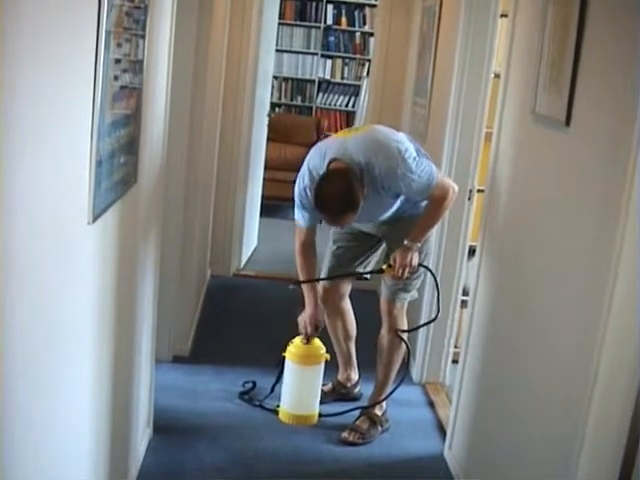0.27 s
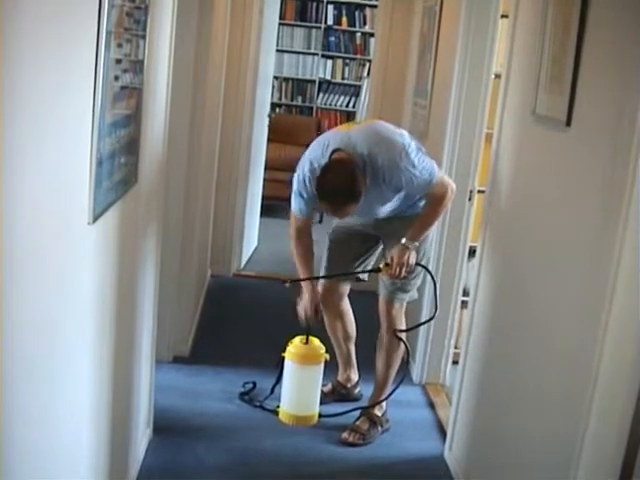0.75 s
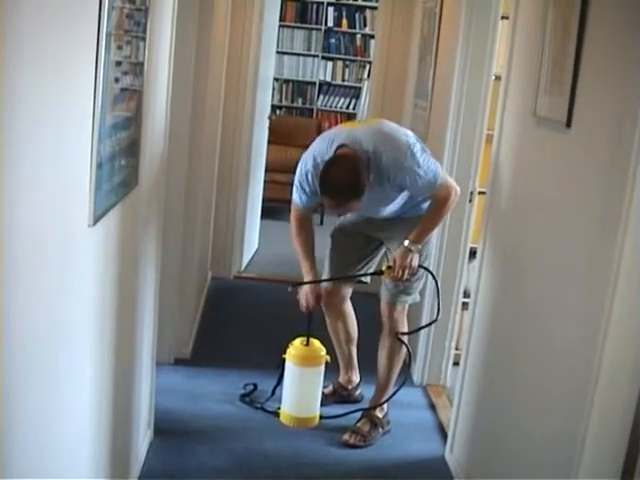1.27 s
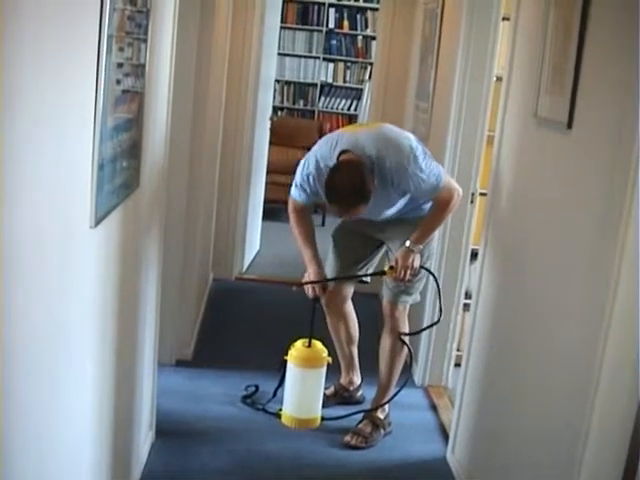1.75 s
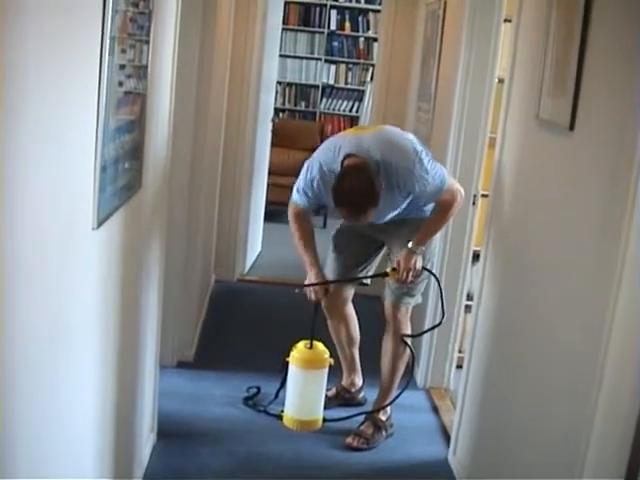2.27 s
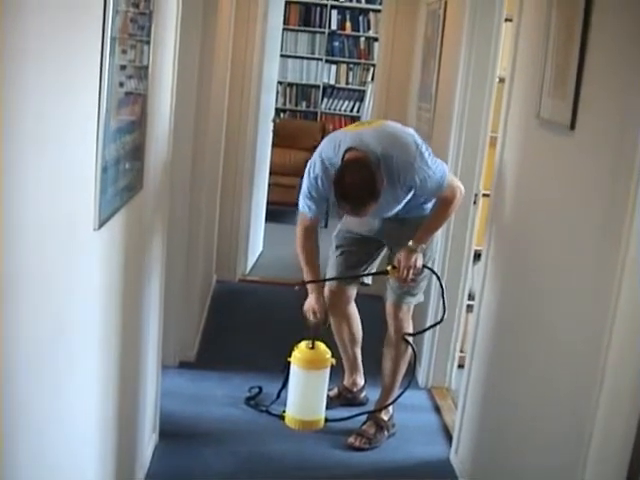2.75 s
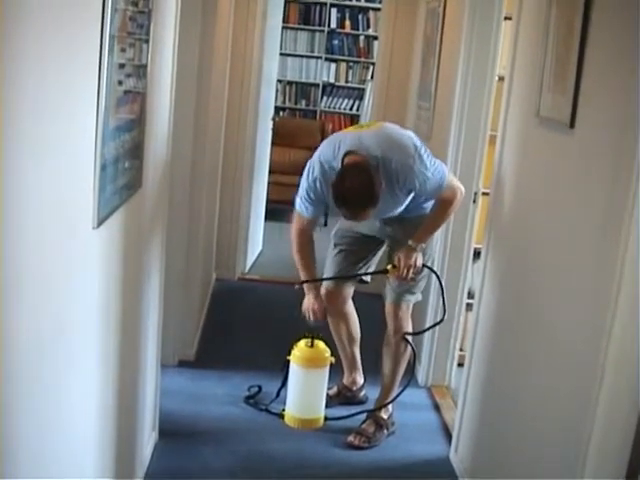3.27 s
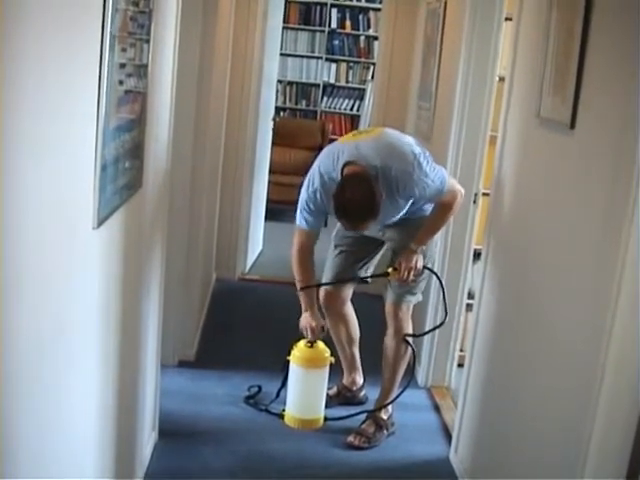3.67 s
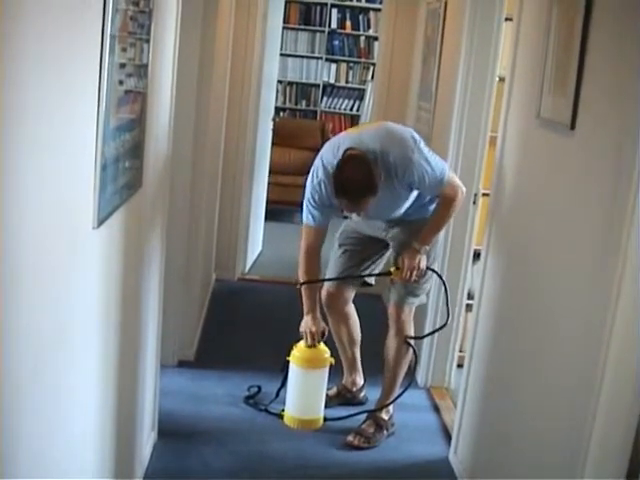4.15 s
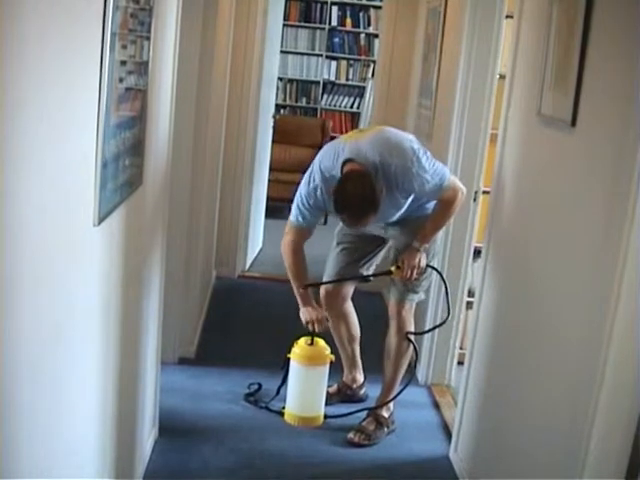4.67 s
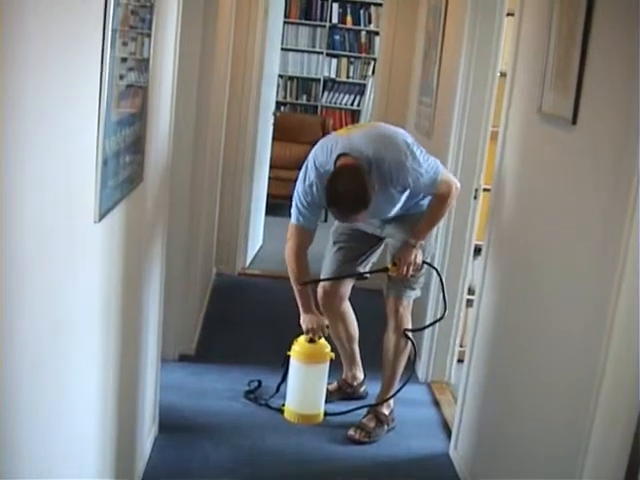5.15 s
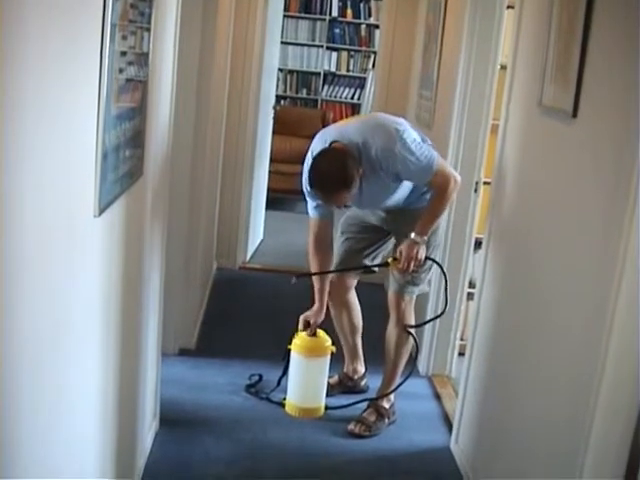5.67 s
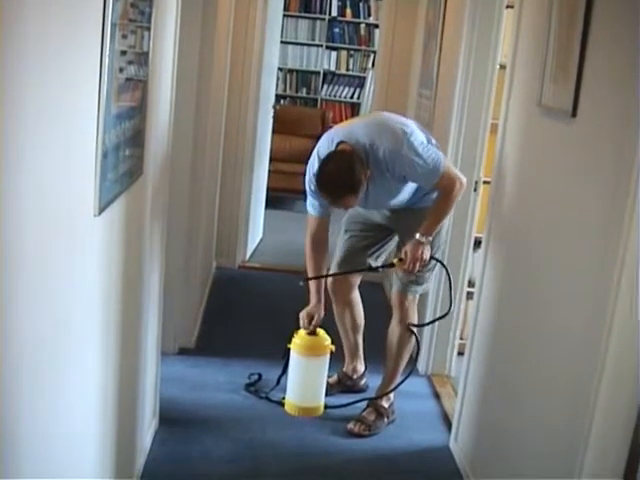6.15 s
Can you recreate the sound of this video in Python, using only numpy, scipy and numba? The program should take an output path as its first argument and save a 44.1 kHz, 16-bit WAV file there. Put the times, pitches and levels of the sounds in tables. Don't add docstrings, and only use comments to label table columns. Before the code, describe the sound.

Repeated plastic pump strokes: breathy air rushes, scraping rub, hollow tank knocks and brief cup squeaks, echoing off close indoor walls over faint hiss.

```python
import sys
import numpy as np
from scipy import signal
from scipy.fft import rfft, irfft
from scipy.io import wavfile
from scipy.ndimage import uniform_filter1d
from numba import njit

SR = 44100
rng = np.random.default_rng(int(sys.argv[2]) if len(sys.argv) > 2 else 0)


def rack_gain(trim_db):
    fader = np.asarray(trim_db, float)
    return 10 ** (fader / 20)


def generate_wav(sig):
    pcm = np.round(np.clip(np.atleast_2d(sig).T, -1, 1) * 32767).astype(np.int16)
    wavfile.write(sys.argv[1], SR, pcm)


N = 283116
OPPOSITE = np.array([[1], [-1]])


def shape(x, points):
    hz, db = np.transpose(points)
    grid = np.fft.rfftfreq(x.shape[-1], 1 / SR) + 1
    return irfft(rfft(x) * rack_gain(np.interp(np.log(grid), np.log(hz), db)), x.shape[-1])


def colour(points):
    y = shape(rng.standard_normal(N), points)
    return y / np.std(y)


def band(x, hz, width):
    return signal.lfilter(*signal.iirpeak(hz, hz / width, SR), x)


def peak(x, db):
    return rack_gain(db) * x / np.abs(x).max()


def ring(modes, extra_db, seconds):
    hz, db, t60 = np.transpose(modes)[:, :, None]
    chance = rng.standard_normal((2, len(modes), 1))
    t = np.arange(int(seconds * SR)) / SR
    db = db + extra_db + 2.6 * chance[0]
    hz = hz * (1 + 0.018 * chance[1])
    return rack_gain(db - 60 * t / t60) * np.sin(2 * np.pi * hz * t)


def add(out, s, x):
    i = int(s * SR)
    out[i:i + len(x)] += x[:N - i]


def walk(rate):
    k = int(SR / rate)
    return uniform_filter1d(np.repeat(rng.standard_normal(N // k + 1), k), k)[:N]


# pitch_hz, level_db
HUSH_SPECTRUM = [(15, -57), (25, 0), (197, -3.5), (582, -1.5), (703, -1), (806, -2), (974, -2), (1090, -5),
                 (2450, -12.5), (2730, -15.5), (5900, -21.5), (10600, -27), (16400, -32)]


def hush():
    hz, width = 6060, 320
    whine = band(band(rng.standard_normal(N), hz, width), hz, width)
    hiss = colour(HUSH_SPECTRUM) + 1.52 * colour(HUSH_SPECTRUM) * OPPOSITE
    return rack_gain(-54.5) * hiss + rack_gain(-73) * whine / np.std(whine)


# start_s, tank_ring_db,
# crack_over_ring_db, clack_tilt_db_per_octave
JOLTS = [
    (0.404, -19.5, -35, -18),
    (0.943, -17, -58, -31),
    (1.505, -15.5, -37, 6),
    (2.053, -13.5, -20, -15),
    (2.606, -14.5, -26, 5),
    (3.147, -16, -54, -15),
    (3.706, -15, -26, 23),
    (4.162, -16.5, -16.5, 10),
    (4.908, -23, -25, 16),
    (5.428, -8.5, -15, 15),
]
# start_s, tank_ring_db, crack_over_ring_db, clack_tilt_db_per_octave
LANDINGS = [(0.0, -16.5, -43, -31), (0.499, -10, -12, -8.5), (1.045, -22, -31, -1), (1.596, -6.5, -11, -9),
            (2.106, -8, -2.5, 8), (2.122, -5.5, -12, -24), (2.692, -25.5, -36, -4), (3.204, -10.5, -24, -1),
            (4.2, -16, -10, -6), (5.015, -18, -19, -9), (5.45, -9, -9.5, -11)]
# start_s, tank_ring_db, crack_over_ring_db, clack_tilt_db_per_octave
TOP_STOPS = [
    (0.302, -37, 1.5, 30),
    (0.843, -33, -6, 14),
    (1.398, -36, -17, -9),
    (1.906, -11, -19, 7),
    (2.451, -14, -11.5, 13),
    (2.854, -25, -19, 1),
    (3.543, -10.5, -18.5, 6),
    (4.062, -55, -8, 12),
    (4.588, -42, -9, 22),
    (5.954, -4.5, -18.5, 8),
]
# start_s, tank_ring_db, crack_over_ring_db, clack_tilt_db_per_octave
RATTLES = [(0.612, -31.5, -12, -10), (0.742, -50.5, 15.5, 4), (1.017, -30.5, -6, 23), (3.037, -50, -9, 0.1),
           (3.136, -36, -17, 0.1), (3.299, -24, -36, 15), (3.691, -30.5, -32, 2), (3.923, -38, -8, 31),
           (4.151, -17, -34, 4), (4.306, -27, -14, 5), (5.192, -68, -11, 2), (5.412, -21.5, -10, 24),
           (5.888, -56.5, 7, 12), (6.07, -35, -33, -10), (6.281, -33.5, -39, 14), (6.33, -33, -7, 1)]


def blows():
    # rows, barrel clack dB above the ring, wall thump dB
    kinds = [(JOLTS, -8, -6.5), (LANDINGS, -1.5, -6), (TOP_STOPS, -4.5, 2.6), (RATTLES, -5, -1.2)]
    return sorted((*row, clack_db, wall_db) for rows, clack_db, wall_db in kinds for row in rows)


def hand_speed(strokes, fastest, air_power=2.06, rub_power=0.82):
    t, flow, drag = np.arange(N) / SR, 0, 0
    for s, length, air_db, rub_db in strokes:
        u = np.clip((t - s) / length, 0, 1) ** (np.log(.5) / np.log(fastest))
        speed = 4 * u * (1 - u)
        flow = flow + rack_gain(air_db) * speed ** air_power
        drag = drag + rack_gain(rub_db) * speed ** rub_power
    return np.array([flow, drag])


# start_s, length_s, air_hiss_db, barrel_rub_db
PULLS = [(.05, 0.23, -43, -40.5), (.585, 0.26, -41.5, -46.5), (1.085, 0.32, -48, -42.5),
         (1.68, 0.28, -45, -43.5), (2.2, 0.26, -45.5, -46.5), (2.79, 0.28, -48.5, -45.5),
         (3.28, 0.32, -46.5, -48.5), (4.28, 0.31, -47.5, -50), (5.2, 0.48, -54.5, -87),
         (5.7, 0.43, -50, -69), (6.08, 0.16, -59.5, -61)]
# start_s, length_s, air_hiss_db, barrel_rub_db
PUSHES = [(-.1, 0.2, -48, -37), (.28, 0.37, -44, -43.5), (.825, 0.3, -41.5, -45), (1.375, 0.42, -44.5, -44),
          (1.955, 0.35, -43.5, -46), (2.435, 0.38, -43.5, -45.5), (3.03, 0.3, -44, -47.5),
          (3.55, 0.37, -45.5, -50.5), (4.04, 0.29, -56, -47), (4.57, 0.33, -49, -48.5),
          (4.903, 0.11, -40.5, -41.5), (5.4, 0.41, -71, -57), (5.93, 0.08, -47, -48),
          (6.25, 0.17, -78, -52)]
# pitch_hz, half_width_hz, level_db
RUB = [(420, 27, 18.5), (560, 17, 12), (1150, 53, 7.5), (1470, 92, -14.5), (1760, 37, -27), (2180, 130, -2)]
# pitch_hz, level_db_per_hz
AIR = [(880, -65), (1500, 7.5), (1760, -2.5), (2110, 9.5), (3180, -10.5), (3690, -5), (8210, -9.5),
       (14700, -23.5), (16400, -1.5)]


def slide():
    flow, drag = hand_speed(PULLS, fastest=0.59) + hand_speed(PUSHES, fastest=0.28)
    shake_db, shake_t60_s = -30.5, 0.47
    t = np.arange(SR // 2) / SR
    for s, db, *_ in blows():
        add(drag, s, rack_gain(db + shake_db - 60 * t / shake_t60_s) * (1 - np.exp(-t / 0.01)))
    grains = rng.standard_normal(N) * rack_gain(4.5 * np.tanh(walk(150)))
    rub = 0
    for hz, width, db in RUB:
        rub = rub + rack_gain(db + 8.2 * np.tanh(walk(25))) * band(grains, hz, 2 * width)
    air, scattered = (flow * rack_gain(2.5 * walk(44) + 3.5 * walk(8.2)) * colour(AIR) for _ in range(2))
    for hz in (3600, 5200, 7500):
        jet = colour([(hz / 2.45, -30), (hz, 0), (hz * 2.04, -30)])
        air = air + flow * rack_gain(-12.5 + 5.6 * walk(12)) * jet
    return air + drag * rub / np.std(rub), scattered


# pitch_hz, level_db, t60_s
TANK = [(205, -5, 0.069), (280, 2.5, 0.06), (318.8, 1.5, 0.1), (353, -13.5, 0.06), (406.1, 0.5, 0.16),
        (593.6, -6, 0.17)]


def tank_ring(wall_db, t):
    wall = np.transpose(TANK)[0][:, None] < 305
    swing_s = np.where(wall, .0015, .007)
    return (ring(TANK, wall_db * wall, .2) * (1 - np.exp(-t / swing_s))).sum(axis=0)


# pitch_hz, level_db, t60_s
BARREL = [(718, 11, 0.013), (800, 10, 0.017), (885, 0, 0.11), (980, -12.5, 0.011), (1077, 2, 0.075),
          (1430, 15, 0.0073), (1577, 0, 0.058), (1858, 10.5, 0.01), (2000, -15, 0.0033), (2085, 7, 0.019),
          (2500, -52, 0.011), (2865, -62, 0.0052), (3900, -95, .02)]


def barrel_clack(tilt_db, t):
    t = t[:1500]
    chatter = rng.standard_normal(1500) * np.exp(-t / 0.0045) * (1 - np.exp(-t / 0.0012))
    favour_db = tilt_db * np.log2(np.transpose(BARREL)[0][:, None] / 1400)
    return signal.fftconvolve(chatter, ring(BARREL, favour_db, 0.044).sum(axis=0))


# pitch_hz, level_db_per_hz
CRACK = [(1470, 10), (2500, -7), (3760, 8), (4510, 1.5), (4840, 1), (7820, -3.5), (13700, -15.5),
         (16400, -8)]
# pitch_hz, width_hz, level_over_ring_db, t60_s
RUMBLE = [(346, 157, -6, .14), (1020, 790, -13, 0.15)]
# pitch_hz, width_hz, level_db, t60_s
JANGLE = [(4600, 1500, -16, 0.24), (5440, 1200, -18, 0.067)]


def knocks():
    out = np.zeros(N)
    t = np.arange(int(.2 * SR)) / SR
    grit = colour(CRACK) * rack_gain(3.8 * walk(400))
    crack_fade = (np.exp(-t / 0.006) + 0.082 * np.exp(-t / 0.0092)) * (1 - np.exp(-t / 0.003))
    for s, db, crack_db, tilt_db, clack_db, wall_db in blows():
        add(out, s, peak(tank_ring(wall_db, t), db - 2.5))
        add(out, s, peak(barrel_clack(tilt_db, t), db + clack_db + 1.5))
        for hz, width, rumble_db, t60 in RUMBLE:
            burst = rng.standard_normal(len(t)) * rack_gain(-60 * t / t60) * (1 - np.exp(-t / 0.0011))
            add(out, s, peak(band(band(burst, hz, width), hz, width), db + rumble_db))
        i = min(int(s * SR), N - len(t))
        add(out, s, rack_gain(db + crack_db + 2) * grit[i:i + len(t)] * crack_fade)
    for hz, width, db, t60 in JANGLE:
        spring = band(band(rng.standard_normal(len(t)), hz, width), hz, width)
        add(out, 2.107, peak(spring * rack_gain(-60 * t / t60), db))
    return signal.sosfilt(signal.butter(2, 190, "high", fs=SR, output="sos"), out)


# pitch_hz, level_db, t60_s
FLOORBOARDS = [(42.9, -55.5, 0.7), (64.3, -47.5, 0.47), (87.3, -43.5, 0.28), (111.4, -34, 0.16)]


def floor_boom():
    out, t = np.zeros(N), np.arange(int(.5 * SR)) / SR
    for rows, boom_db in ((JOLTS, -26), (LANDINGS, -27.5), (THUDS, -45)):
        for s, db, *_ in rows:
            hum = ring(FLOORBOARDS, 0, .5).sum(axis=0) * (1 - np.exp(-(t / 0.035) ** 2))
            add(out, s, peak(hum, db + boom_db + 3.5))
    return out


# start_s, peak_db, pitch_hz
THUDS = [(0.066, -31, 205), (0.613, -34.5, 181), (0.749, -52, 280), (1.198, -25.5, 220), (1.32, -38, 275),
         (1.719, -28.5, 208), (2.231, -30.5, 239), (2.355, -47, 277), (2.854, -26.5, 218),
         (3.034, -40.5, 270), (3.372, -27.5, 210), (4.345, -25.5, 233), (4.596, -46.5, 260),
         (4.903, -42, 280)]


def thuds():
    out = np.zeros(N)
    for s, db, hz in THUDS:
        cycles = np.arange(int(3 * SR / hz)) * hz / SR
        add(out, s, rack_gain(db + 17.5) * cycles * np.exp(-cycles / 0.58) * np.sin(2 * np.pi * cycles))
    return out


# start_s, peak_db, pitch_hz, width_hz
TICKS = [(.150, -15, 560, 200), (.948, -24, 750, 403), (1.144, -16, 550, 199), (3.137, -25, 2150, 495),
         (3.405, -16, 420, 119.4), (3.691, -26, 1550, 600), (4.062, -26, 2320, 304),
         (4.162, -25, 1600, 1500), (4.84, -28, 550, 202), (5.015, -27, 3900, 2500), (5.89, -24, 2000, 600),
         (6.295, -41, 1612, 1200), (6.309, -18, 553, 253), (6.35, -24, 560, 246.6), (6.37, -49, 2000, 1180)]


def ticks():
    out, t = np.zeros(N), np.arange(2000) / SR
    for s, db, hz, width in TICKS:
        chatter = rng.standard_normal(len(t)) * np.exp(-t / 0.003)
        add(out, s, peak(band(chatter, hz, width), db - 12))
    return out


# start_s, length_s, first_hz, last_hz, peak_db
SQUEAKS = [(0.409, 0.015, 1045, 980, -20.5), (0.411, 0.03, 962, 832, -17), (0.952, 0.028, 788, 755, -23),
           (1.515, 0.037, 805, 810, -20), (2.056, 0.02, 1057, 1003, -23.5), (2.058, 0.048, 903, 800, -19.5),
           (2.606, 0.0092, 1150, 1042, -18), (2.608, 0.035, 914, 847, -14.5), (3.163, 0.011, 794, 775, -29),
           (3.72, 0.036, 843, 784, -13), (3.771, 0.022, 800, 745, -20), (4.098, 0.017, 1090, 1098, -17.5),
           (4.112, 0.034, 1077, 970, -29), (0.984, 0.035, 770, 748, -35.5), (4.907, 0.014, 1210, 1046, -5),
           (4.912, 0.062, 1100, 885, -23), (4.95, 0.051, 896, 826, -29.5), (5.436, 0.013, 1150, 1089, -8.5)]
# pitch_hz, level_db
SQUEAK_OVERTONES = [(2500, -19.5), (3300, -26), (4400, -24), (5500, -32.5), (6800, -22), (8000, -32),
                    (9500, -55), (16500, -80)]


def squeaks():
    out, (over_hz, over_db) = np.zeros(N), np.transpose(SQUEAK_OVERTONES)
    for s, length, first_hz, last_hz, db in SQUEAKS:
        octave_db = min(-15 + 69.5 * (first_hz / 1000 - 1), 1.5)
        u = np.linspace(0, 1, int(length * SR))
        glide_hz = first_hz + (last_hz - first_hz) * (1 - np.exp(-u / 0.353))
        phase = 2 * np.pi * np.cumsum(glide_hz) / SR
        k = np.arange(3, int(16400 / first_hz))[:, None]
        overtone_gain = rack_gain(np.interp(k * first_hz, over_hz, over_db))
        stack = (overtone_gain * np.sin(k * phase + k * k)).sum(axis=0)
        grip = np.sin(np.pi * u ** 0.9) ** 1.83
        harsh = grip * np.sin(2 * phase + 1) + 0.74 * stack
        add(out, s, rack_gain(db) * grip * (np.sin(phase) + rack_gain(octave_db) * harsh))
    return out


# lag_s, left_db, right_db
ECHOES = [(.0007, -20.5, -20.5), (.0016, -74.5, -10), (.0041, -10.5, -15), (.0075, -8.5, -46.5),
          (.013, -6.5, -30), (0.027, -28.5, -11.5), (0.049, -17.5, -32.5)]


def early_echoes(pump):
    out = np.zeros((2, N))
    for lag, *side_db in ECHOES:
        dull = signal.lfilter(*signal.butter(1, 9000 / (1 + 120 * lag), fs=SR), pump)
        out[:, int(lag * SR):] += rack_gain(side_db)[:, None] * dull[:N - int(lag * SR)]
    return out


@njit
def walls(x, lags, gain, damp):
    line, soft, out = np.zeros((8, 4096)), np.zeros(8), np.zeros((2, len(x)))
    for i in range(len(x)):
        total = 0.
        for k in range(8):
            soft[k] += (1 - damp) * (gain[k] * line[k, (i - lags[k]) & 4095] - soft[k])
            total += soft[k]
            out[k % 2, i] += soft[k] * (1 - (k & 2))
        for k in range(8):
            line[k, i & 4095] = x[i] + soft[k] - total / 4
    return out


def hall(pump, t60_s=0.47, damp=0.44):
    lags = np.array([487, 641, 797, 953, 1163, 1373, 1621, 2039])
    return walls(pump + 1e-18, lags, rack_gain(-60 * lags / SR / t60_s), damp)


def scene():
    sliding, scattered = slide()
    pump = sliding + knocks() + thuds() + ticks() + squeaks()
    direct = pump + 0.48 * scattered * OPPOSITE
    return direct + early_echoes(pump) + rack_gain(-14) * hall(pump) + floor_boom() + hush()


def low_pass(x):
    return signal.sosfilt(signal.butter(12, 16400, fs=SR, output="sos"), x)


# pitch_hz, left_minus_right_db
PORT_BALANCE = [(60, 1), (110, -5), (200, 1.5), (380, -1.5), (700, 4.5), (1290, 1.5), (2380, 6.5),
                (4400, 2.5), (8120, 1), (15000, 1)]
# pitch_hz, level_db
PORT_SIDE = [(60, -3.5), (300, -4.5), (1000, -1), (4000, 0.5), (14000, -4.5)]
# pitch_hz, level_db
IMAGE = [(200, -37), (800, -25.5), (2200, -16.5), (3300, -9), (4000, -76)]


def record(dry):
    mid, side = dry.mean(axis=0), shape((dry[0] - dry[1]) / 2, PORT_SIDE)
    hz, lean_db = np.transpose(PORT_BALANCE)
    ports = np.array([shape(mid + sign * side, np.transpose([hz, sign * lean_db / 2])) for sign in (1, -1)])
    carrier = np.cos(2 * np.pi * 12103 * np.arange(N) / SR)
    ports = ports + shape(ports, IMAGE) * carrier
    cut = signal.sosfilt(signal.ellip(8, .2, 70, 15700, fs=SR, output="sos"), ports)
    return low_pass(2 * np.tanh(cut / 2))


dry = scene()
out = record(dry)
generate_wav(out)
```